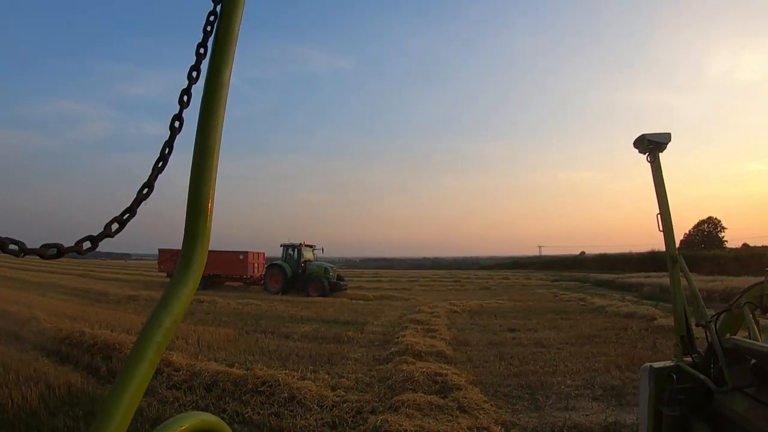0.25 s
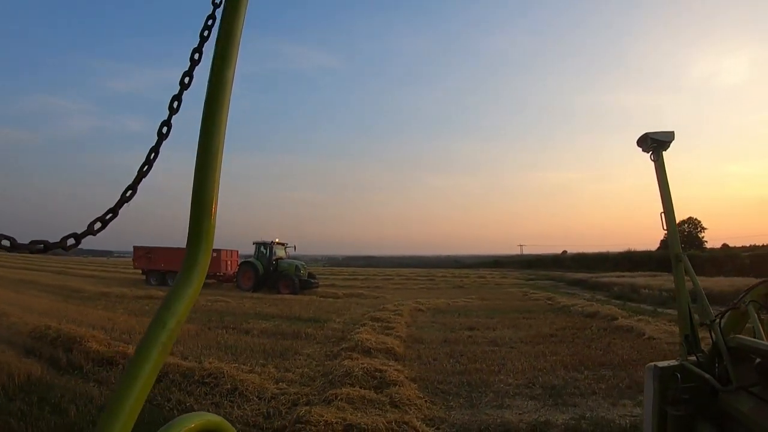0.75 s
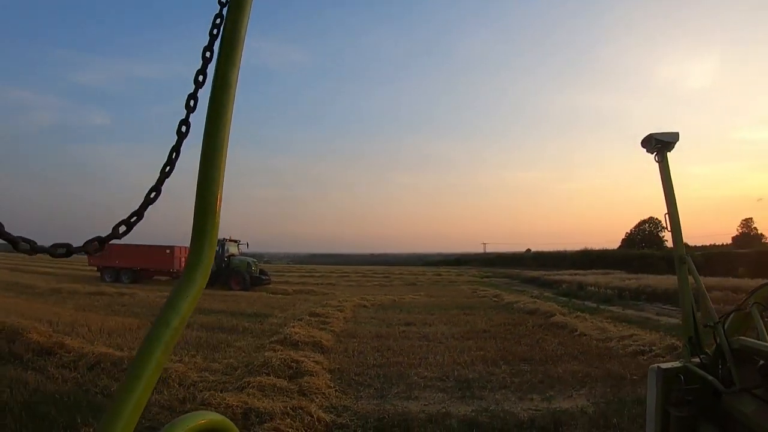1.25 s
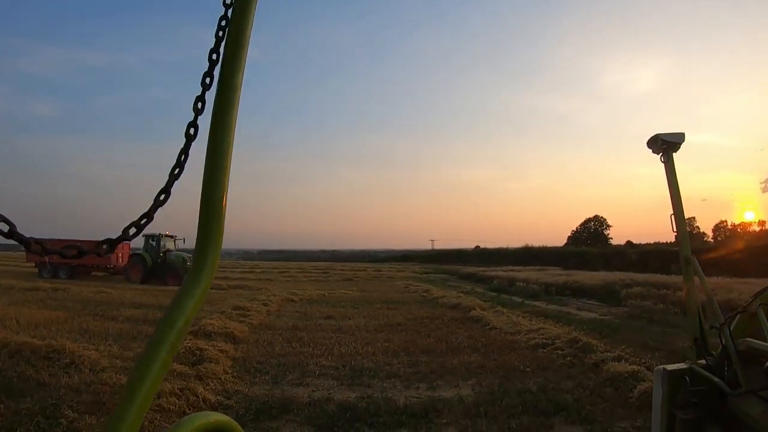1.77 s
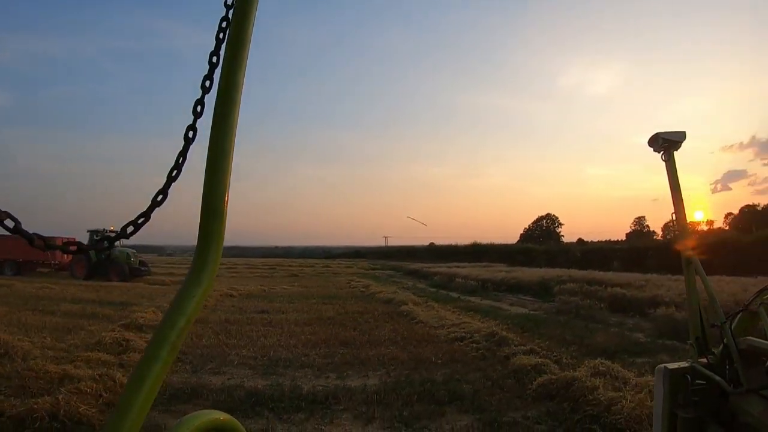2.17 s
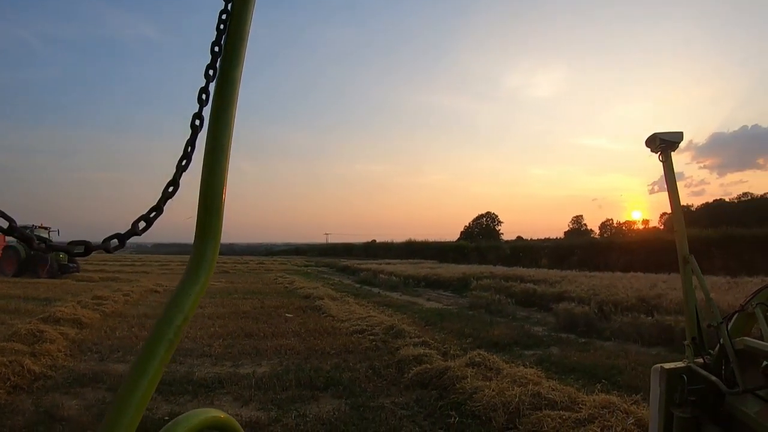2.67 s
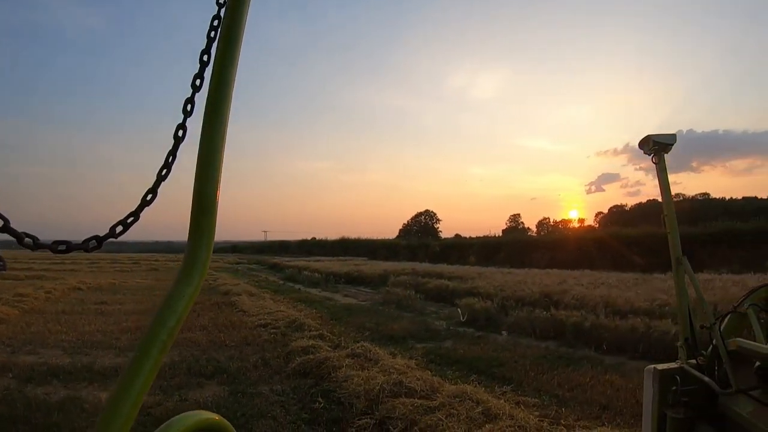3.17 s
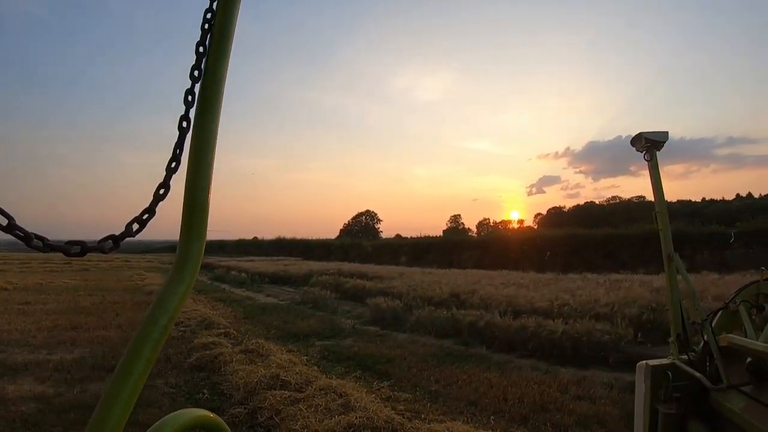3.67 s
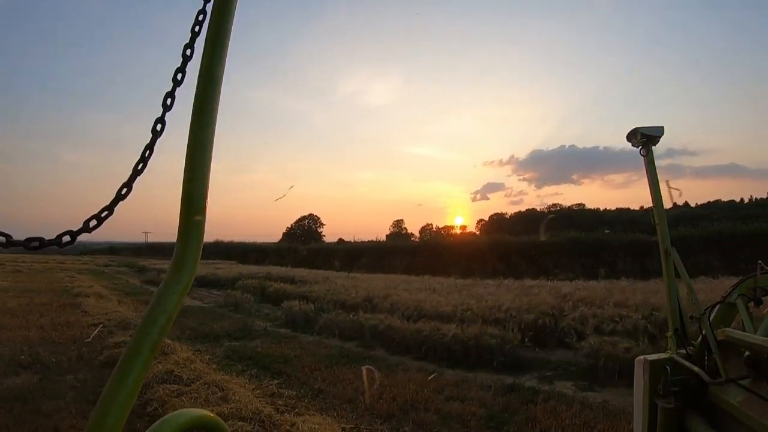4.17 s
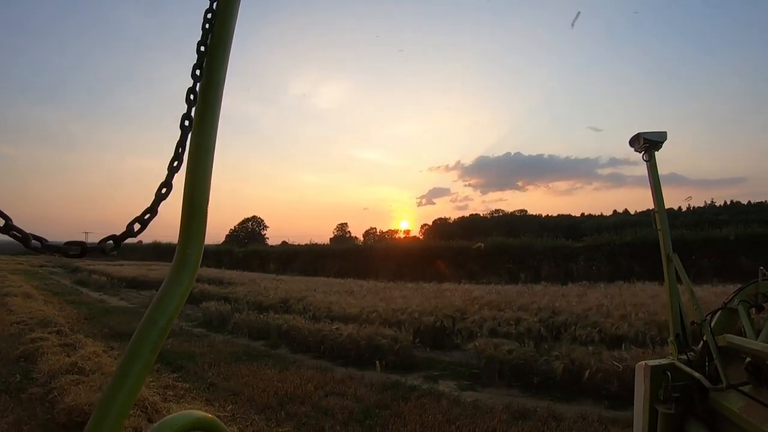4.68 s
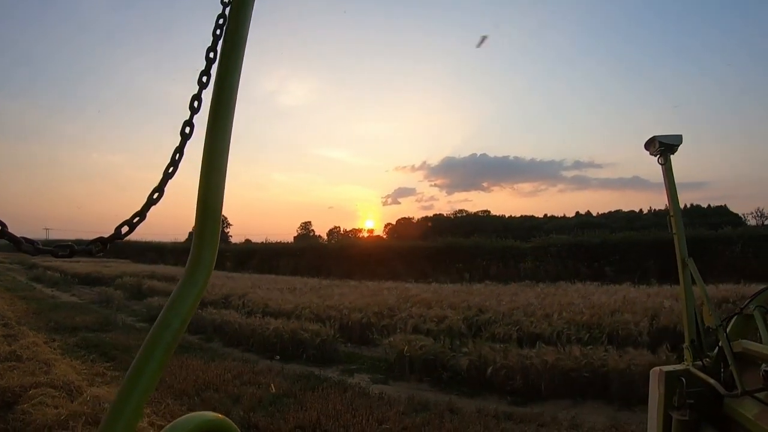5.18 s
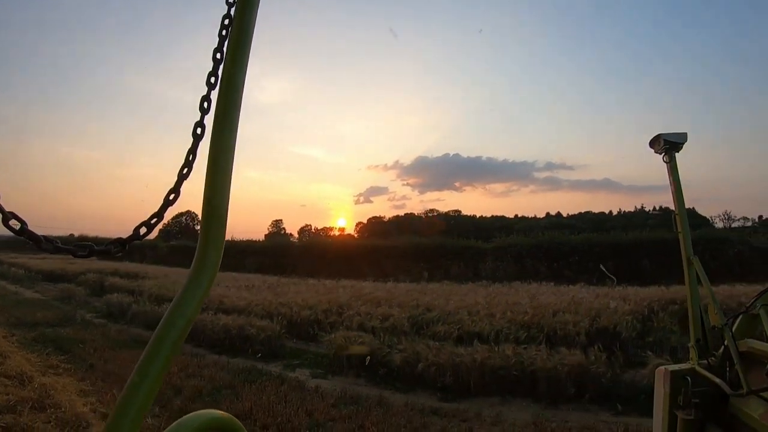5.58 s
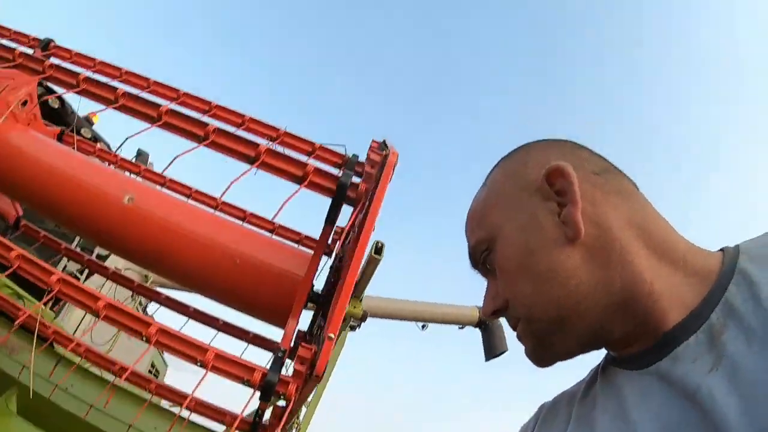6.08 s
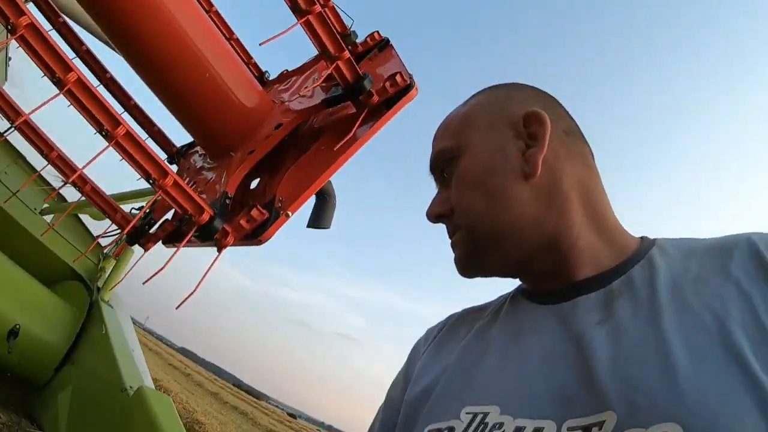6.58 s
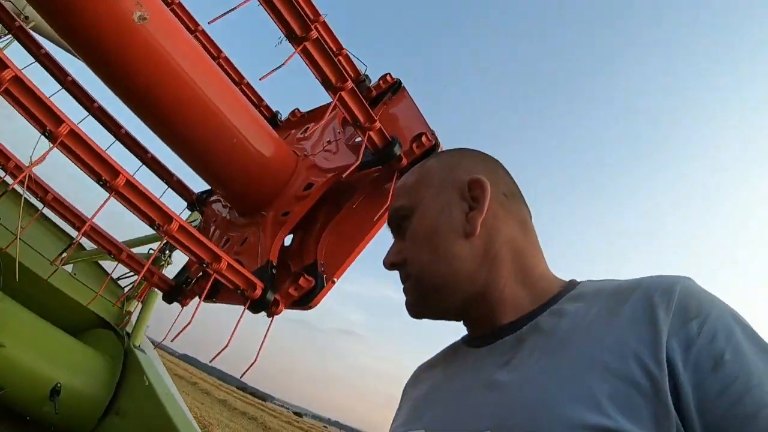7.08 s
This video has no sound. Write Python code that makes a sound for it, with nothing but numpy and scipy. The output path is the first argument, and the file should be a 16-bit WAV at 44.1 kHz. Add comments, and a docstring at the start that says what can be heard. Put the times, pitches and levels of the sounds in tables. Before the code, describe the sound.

From 0 to about 5.7 s, a combine harvester works at full load, heard close from on board: a loud, thick roar coloured by resonating sheet metal, deep rumble beneath, and a low-to-middle drone of shafts and drum whose tones waver and beat, sagging slightly in pitch around 1 s. Grainy chaff hiss rides on top in small swells, busier near 4.7 to 5.5 s. At 5.7 s it cuts off dead, leaving about a quarter second of silence. By 5.95 s a much quieter outdoor scene has quickly faded in beside the idling machine. Straw crunches and snaps crisply, densest from 6.0 to 6.3 s, then sparser. A clean low hum grows to its strongest from 6.6 to 7.0 s, then drops back, with faint whines and cooling air. Wind puffs thump the hand-held microphone around 6.2 to 6.3 s and 6.9 to 7.2 s, until the end at 7.3 s.

```python
"""A combine harvester at work, heard from on board: noise shaped by panel resonances makes the threshing roar,
smeared tones make the drone of drum and shafts, and grainy noise hisses in swells of chaff.
It cuts off abruptly to a short silence; then a second scene fades in beside the idling machine: a low steady
hum with fainter whines, noise gusts and puffs of wind on the microphone, and straw underfoot that rustles
in strokes of grainy noise and snaps in short ringing bursts."""
import sys
import numpy as np
from scipy import signal
from scipy.fft import rfft, irfft, next_fast_len
from scipy.io import wavfile
from scipy.ndimage import uniform_filter1d, map_coordinates

SR = 44100
rng = np.random.default_rng(int(sys.argv[2]) if len(sys.argv) > 2 else 0)


def digitize_waveform(pressure):
    """Quantize a signal to 16-bit integers and store it at the path in sys.argv[1].

    Rows of a 2-D input are taken as channels; values are limited to [-1, 1].
    """
    field = np.atleast_2d(pressure).T
    bounded = np.clip(field, -1, 1)
    quanta = np.round(bounded * 32767).astype(np.int16)
    wavfile.write(sys.argv[1], SR, quanta)


N = 323694  # length in samples


def amp(db):
    """Gain of a level in dB."""
    return 10 ** (np.asarray(db) / 20)


def unit(x):
    """Scaled to rms 1."""
    return x / np.sqrt(np.mean(x ** 2) + 1e-20)


def curves(rows):
    """One value per sample for each column after the time."""
    time_s, *columns = np.transpose(rows)
    return [np.interp(np.arange(N) / SR, time_s, column) for column in columns]


def wobble(rate):
    """A smooth random curve, rate knots a second."""
    knots = rng.standard_normal(int(N * rate / SR) + 4)
    return map_coordinates(knots, [np.arange(N) * rate / SR])


def filtered(x, response):
    """x times a response of frequency."""
    m = next_fast_len(len(x) + 8192)
    return irfft(rfft(x, m) * response(np.fft.rfftfreq(m, 1 / SR)), m)[:len(x)]


def coloured(x, spectrum):
    """x through (Hz, dB) points on a log axis, rms 1."""
    f, db = np.transpose(spectrum)
    return unit(filtered(x, lambda hz: amp(np.interp(np.log(hz + 1), np.log(f + 1), db))))


def rush(patchy_db):
    """White noise with patches of random gain in time and frequency."""
    z = signal.stft(rng.standard_normal(N + 512), nperseg=512)[2]
    field = uniform_filter1d(rng.standard_normal(z.shape), 6, 0)
    field = uniform_filter1d(field, 10, 1)
    return signal.istft(z * amp(patchy_db * unit(field)), nperseg=512)[1][:N]


def grainy(spiky_db, rate):
    """White noise in tiny bursts of uneven size, as of many small impacts."""
    return unit(amp(spiky_db * wobble(rate)) * rng.standard_normal(N))


def tone(hz):
    """A sine of rms 1 that follows a pitch curve."""
    return np.sqrt(2) * np.sin(2 * np.pi * (np.cumsum(hz) / SR + rng.random()))


# Gusts, before the fade-in gain: time_s, buffet_db, flutter_db
GUSTS = [(5.95, -40.5, -62), (6.12, -40, -56), (6.18, -32, -51), (6.28, -31, -39.5), (6.4, -34.5, -46),
         (6.5, -36, -45), (6.57, -38, -43), (6.63, -39, -41), (6.73, -33, -32.5), (6.82, -30.5, -37),
         (6.87, -31, -39), (6.94, -28, -32.5), (6.99, -32, -28.5), (7.03, -32, -33), (7.08, -38, -40),
         (7.15, -32.5, -42), (7.22, -29.5, -40), (7.27, -34, -44), (7.34, -35, -53)]
# Colour of the low buffets: freq_hz, density_db (relative, per Hz)
BUFFET_COLOUR = [(9, -39), (15, 1), (43, 1.5), (92, -5), (130, -2), (210, -9), (300, -25), (550, -120)]
# Colour of the higher flutter: freq_hz, density_db (relative, per Hz)
FLUTTER_COLOUR = [(140, -37), (210, 1.5), (330, 0), (430, -7.5), (560, -21.5), (900, -55), (1300, -120)]
# Single puffs, strength before the onset and fade-in gain: start_s, strength_db, pitch_hz, t60_s
PUFFS = [(6.17, -19, 55, .07), (6.262, -11, 60, 0.096), (6.264, -18, 228, 0.045), (6.30, -16, 95, 0.085),
         (6.335, -16, 75, .07), (6.93, -16, 110, .06), (6.975, -17, 330, .05), (7.01, -17, 60, .07),
         (7.179, -19, 100, .06), (7.222, -20, 55, .06)]


def wind():
    """Air buffets the hand-held microphone in lumps, and single puffs jolt it as decaying sines."""
    buffet_db, flutter_db = curves(GUSTS)
    lumps = amp(1.2 * wobble(40) + .6 * wobble(16))
    buffet = unit(lumps * coloured(rng.standard_normal(N), BUFFET_COLOUR))
    flutter = unit(lumps * amp(1.3 * wobble(22)) * coloured(rng.standard_normal(N), FLUTTER_COLOUR))
    out = amp(buffet_db) * buffet + amp(flutter_db) * flutter
    t = np.arange(SR // 8) / SR
    onset = 1 - np.exp(-t / 0.0036)
    for start_s, strength_db, pitch_hz, t60_s in PUFFS:
        start = round(start_s * SR)
        puff = amp(strength_db - 60 * t / t60_s) * onset * np.sin(2 * np.pi * pitch_hz * t)
        out[start:][:len(t)] += puff[:N - start]
    return out


# Feet and hands in the stubble, before the fade-in gain:
# peak_s, length_s, crunch_db, bright_db (swish relative to crunch)
STUBBLE_STROKES = [(6.03, 0.033, -42, -19), (6.095, 0.04, -39.5, -11.5), (6.128, 0.05, -36.5, -5),
                   (6.172, 0.04, -54, -2), (6.208, 0.038, -56.5, -1.5), (6.241, 0.0091, -44, -4),
                   (6.301, 0.026, -47, -3), (6.32, 0.043, -41.5, 0), (6.447, 0.045, -56, 0),
                   (6.514, 0.04, -48.5, -9), (6.577, 0.059, -55, 1.5), (6.628, 0.056, -46, -4),
                   (6.688, 0.04, -48, -8.5), (6.73, 0.041, -50.5, -1), (6.812, 0.054, -62, 2),
                   (7.047, 0.054, -61, -10), (7.113, 0.06, -56, -9.5), (7.19, 0.13, -49.5, -15.5),
                   (7.254, 0.05, -57.5, -6), (7.312, 0.07, -54, -3)]
# Colour of the crushing: freq_hz, density_db (relative, per Hz)
CRUNCH_COLOUR = [(410, -56), (750, 5), (1100, -16), (1400, -2.5), (2200, 2), (3300, 0), (4800, -7.5),
                 (5600, -25), (7000, -50), (13000, -120)]
# Colour of the brushing: freq_hz, density_db (relative, per Hz)
SWISH_COLOUR = [(3000, -28), (4500, -3), (5100, -3), (5700, -12), (6500, -4), (7000, -5.5), (7800, -8),
                (9200, -14), (10800, -20), (11500, -34), (14000, -42), (15300, -66)]
# Snapping stalks, level before the onset and fade-in gain: start_s, level_db, centre_hz, width_hz
STALK_SNAPS = [(6.015, -43, 7600, 2000), (6.028, -40, 3000, 3000), (6.087, -30, 1800, 1200),
               (6.105, -27, 2000, 2000), (6.138, -30, 2700, 1000), (6.142, -24, 3200, 2000),
               (6.1423, -35, 8000, 4000), (6.154, -28, 2500, 2000), (6.171, -39, 2100, 900),
               (6.175, -45, 8500, 3500), (6.198, -50, 9500, 2500), (6.238, -36.5, 5000, 7000),
               (6.242, -26.5, 3500, 6000), (6.243, -32, 2100, 900), (6.305, -50, 10940, 3500),
               (6.397, -54, 7700, 1200), (6.428, -48, 7500, 3000), (6.573, -49, 8500, 5000),
               (6.6, -37, 2500, 500), (6.629, -33, 4300, 700), (6.715, -45, 8500, 4000),
               (6.73, -44, 4400, 1500), (6.748, -50, 7200, 2000), (6.857, -49, 8000, 4000),
               (7.042, -50, 7500, 5000), (7.113, -47, 3450, 400), (7.195, -37, 2470, 400),
               (7.218, -50, 8000, 5000), (7.253, -45, 2670, 400)]
RISE_DB, FALL_DB = 18.5, 24.5  # level lost one stroke length before and after the peak
STIR_DB, STIR_SWISH_DB = -56, -73.5  # the stubble never quite rests
SNAP_T60_S, SNAP_RING = 0.0092, 12.5  # shortest decay; a narrower snap rings SNAP_RING / width_hz s longer


def straw():
    """Stubble crushed and brushed in strokes that swell and break off, with single stalks that snap."""
    now = np.arange(N) / SR
    crunch, swish = amp(STIR_DB), amp(STIR_SWISH_DB)
    for peak_s, length_s, crunch_db, bright_db in STUBBLE_STROKES:
        u = (now - peak_s) / length_s
        loss_db = np.where(u < 0, RISE_DB * np.abs(u), FALL_DB * np.abs(u) ** 1.57)
        stroke = amp(crunch_db - loss_db)
        crunch = crunch + stroke
        swish = swish + amp(bright_db) * stroke
    crunch_noise = grainy(spiky_db=1.8, rate=320) + 0.7 * rush(patchy_db=2.5)
    swish_noise = grainy(spiky_db=2, rate=350) + .7 * rush(patchy_db=3)
    out = crunch * coloured(crunch_noise, CRUNCH_COLOUR) + swish * coloured(swish_noise, SWISH_COLOUR)
    t = np.arange(SR // 20) / SR
    onset = 1 - np.exp(-t / 0.00073)
    for start_s, level_db, centre_hz, width_hz in STALK_SNAPS:
        band = lambda f: 1 / (1 + (2 * (f - centre_hz) / width_hz) ** 4)
        burst = unit(filtered(rng.standard_normal(len(t)), band))
        t60_s = SNAP_T60_S + SNAP_RING / width_hz
        out[round(start_s * SR):][:len(t)] += amp(level_db - 60 * t / t60_s) * onset * burst
    return out


# Idling levels before the fade-in gain: time_s, machine_db (reference for noise and whines), air_db
IDLE_LEVELS = [(5.95, -52, -50), (6.12, -52, -56), (6.35, -56, -59), (6.65, -48.5, -57), (6.9, -50.5, -53),
               (7.15, -50.5, -56), (7.34, -49.5, -60)]
# The hum as the listener moves, before the fade-in gain: time_s, level_db
HUM_LEVEL = [(5.95, -47), (6.1, -42.5), (6.48, -36.5), (6.62, -30), (6.975, -29.5), (7.02, -37.5),
             (7.15, -40), (7.34, -44)]
HUM_HZ = 259
# Lower engine orders, before the fade-in gain: pitch_hz, level_db
ENGINE_ORDERS = [(86.2, -43), (108, -45), (218, -50)]
# Higher, fainter engine orders: pitch_hz, spread_hz (unsteadiness), level_db (relative to machine_db)
HIGHER_ENGINE_ORDERS = [(330, 5, -7), (422, 4, -4), (515, 4, -8), (848, 5, -4.5), (1211, 8, -10), (1310, 8, -10)]
# Colour of the machine noise: freq_hz, density_db (relative, per Hz)
MACHINE_COLOUR = [(150, -33), (250, -4), (430, -7), (540, -3.5), (840, -5.5), (900, -4.5), (1020, -10),
                  (1100, -7.5), (1310, -9), (1380, -16), (1700, -13.5), (2200, -20.5), (3500, -74)]
# Colour of the cooling air: freq_hz, density_db (relative, per Hz)
AIR_COLOUR = [(900, -35), (1600, 2), (2800, 3.5), (3200, 5), (3600, 1), (4000, -1), (4500, -9), (5000, -6),
              (5600, -22), (6500, -14), (8500, -25), (10000, -21), (11000, -31), (13000, -60),
              (15000, -120)]


def idling():
    """The idling machine: one clean hum, low engine orders and faint whines over machine noise and cooling air."""
    machine_db, air_db = curves(IDLE_LEVELS)
    orders = sum(amp(level_db + 2.5 * wobble(6)) * tone(pitch_hz + 1.5 * wobble(10))
                 for pitch_hz, level_db in ENGINE_ORDERS)
    whines = sum(amp(level_db + 3.1 * wobble(15)) * tone(pitch_hz + spread_hz * wobble(18))
                 for pitch_hz, spread_hz, level_db in HIGHER_ENGINE_ORDERS)
    noise = amp(7.0) * coloured(rush(patchy_db=2.0), MACHINE_COLOUR)
    machine = amp(machine_db) * (noise + whines)
    air = amp(air_db) * coloured(rush(patchy_db=6.0), AIR_COLOUR)
    hum = amp(curves(HUM_LEVEL)[0] + 0.4 * wobble(12)) * tone(HUM_HZ + 0.6 * wobble(8))
    return hum + orders + machine + air


# Levels of the rotating parts: time_s, shaft_db, auger_db, drum_db, fan_db
DRONE_LEVELS = [(0, -21, -28, -31, -33), (0.3, -23, -25, -23, -34), (0.9, -22, -24, -20.5, -31),
                (1.3, -21, -25, -23.5, -33), (1.8, -24, -24, -19, -33), (2.1, -23, -26, -24.5, -32),
                (2.45, -22, -26, -32, -29), (2.9, -27, -26, -21.5, -25), (3.25, -26, -27, -26, -24),
                (3.55, -25, -23, -23, -22.5), (3.85, -30, -34, -21, -25), (4.2, -28, -35, -19.5, -33),
                (4.55, -29, -36, -22.5, -30), (4.9, -30, -35, -28, -23.5), (5.3, -24, -24, -25, -23),
                (5.66, -26, -24, -29, -22.5)]
# Shaft, auger, drum, fan in turn: pitch_hz, smear_hz (sets pitch wander and beating), steady (amplitude 0-1)
DRONE_TONES = [(165, 6, .88), (255, 22, .1), (383, 7, .92), (472, 9, .87)]
# Shaft speed sags under load: time_s, speed_ratio
SHAFT_SPEED = [(0, 1.008), (0.5, 1.004), (0.9, .985), (1.4, .988), (1.9, 1.006), (2.9, 1.008), (3.6, 1.002),
               (4.2, 1.0), (5.66, 1.0)]


def drone():
    """Rotating parts under uneven load: each tone is part steady, part a smear that beats in and out of the roar."""
    out = 0
    speed = curves(SHAFT_SPEED)[0]
    for level_db, (pitch_hz, smear_hz, steady) in zip(curves(DRONE_LEVELS), DRONE_TONES):
        turn = 2 * np.pi * np.cumsum(pitch_hz * speed + .4 * smear_hz * wobble(14)) / SR
        smear = (1 - steady ** 2) ** .5
        along = steady + smear * wobble(2 * smear_hz)
        across = smear * wobble(2 * smear_hz)
        smeared_tone = unit(along * np.sin(turn) + across * np.cos(turn))
        out = out + amp(level_db + .6 * wobble(4)) * smeared_tone
    return out


# Levels of the working machine: time_s, rumble_db, roar_db, hiss_db (chaff, before its swells)
WORK_LEVELS = [(0, -19, -15, -31), (1.5, -20, -15.5, -32.5), (2.5, -20, -15, -30), (4, -18.5, -15.5, -31),
               (4.7, -19, -15.5, -29.5), (5.66, -21, -15, -31.5)]
# Sheet-metal resonances: pitch_hz, width_hz, boost_db
PANEL_RESONANCES = [(129, 3.9, -3.5), (140.4, 4.4, 7), (347, 25, 7), (506.6, 11, 2), (617, 54, 4),
                    (784, 52, 5), (1220, 140, 8)]
# Colour of the rumble: freq_hz, density_db (relative, per Hz)
RUMBLE_COLOUR = [(8.8, -45.5), (15, -10), (38, -6), (119, -4.5), (156, -6.5), (200, -8), (260, -39),
                 (440, -120)]
# Colour of the roar before the panels: freq_hz, density_db (relative, per Hz)
ROAR_COLOUR = [(65, -26.5), (110, -4.5), (160, -4), (215, -3.5), (300, -4.5), (410, -3), (480, -2.5),
               (540, -7.5), (780, -12.5), (1080, -30.5), (2000, -31.5), (2600, -52.5), (4400, -120)]
# Colour of the chaff hiss: freq_hz, density_db (relative, per Hz)
HISS_COLOUR = [(530, -29), (900, -1.5), (1430, -10), (2750, -15), (3200, -21.5), (3700, -20), (5850, -36),
               (7300, -34), (8700, -39.5), (9650, -47.5), (10800, -42.5), (11600, -51.5), (13300, -52.5),
               (15600, -71)]
# Thicker wads and gaps in the crop: peak_s, swell_db (rise or dip of the hiss)
CROP_CLUMPS = [(0.0, 3), (0.06, -2), (0.12, 1), (1.09, -2.5), (1.43, -1.5), (1.89, 1.5), (2.3, 1.5),
               (2.49, -1), (2.56, 2.5), (2.85, 1), (2.95, -2), (3.48, 1), (3.79, 1.5), (4.18, -3),
               (4.24, 1), (4.69, 3), (4.76, -2), (4.8, 2.5), (4.95, 1.5), (5.11, 2), (5.22, 3.5),
               (5.31, 2.5), (5.5, 2.5)]
CLUMP_S = 0.031  # half length of a swell


def threshing():
    """Crop beaten through the drum shakes the panels; grain and chaff rattle over the sieves."""
    rumble_db, roar_db, hiss_db = curves(WORK_LEVELS)
    panels = lambda f: amp(sum(boost_db / (1 + (2 * (f - pitch_hz) / width_hz) ** 2)
                               for pitch_hz, width_hz, boost_db in PANEL_RESONANCES))
    roar = unit(filtered(coloured(rush(patchy_db=.4), ROAR_COLOUR), panels))
    hiss = coloured(grainy(spiky_db=1.5, rate=270) + 0.7 * rush(patchy_db=1.2), HISS_COLOUR)
    rumble = coloured(rng.standard_normal(N), RUMBLE_COLOUR)
    t = np.arange(N) / SR
    swell_db = sum(db * np.exp(-((t - peak_s) / CLUMP_S) ** 2) for peak_s, db in CROP_CLUMPS)
    swell_db = swell_db + 0.4 * wobble(9) + 0.7 * wobble(25)
    return amp(rumble_db) * rumble + amp(roar_db) * roar + amp(hiss_db + swell_db) * hiss


CUT_S = 5.6722  # the working scene ends abruptly
FLOOR_DB, FLOOR_T60_S = -36, .05  # lower bound of the gain at the cut, and its fall
# The idling scene fades in: time_s, gain_db
FADE_IN = [(5.885, -64), (5.905, -21), (5.93, -9), (5.96, 1), (7.34, 2)]


def scene():
    """The working machine, a short silent gap, then the idling machine with wind and straw."""
    t = np.arange(N) / SR
    working = np.clip(t / .002, 0, 1) * np.clip((CUT_S - t) / .00012, 0, 1)  # soft opening, sudden end
    floor = (t > CUT_S - .001) * amp(FLOOR_DB - 60 * np.abs(t - CUT_S) / FLOOR_T60_S)
    working = np.maximum(working, floor)
    beside = amp(curves(FADE_IN)[0]) * (t > FADE_IN[0][0])
    return ((threshing() + drone()) * working + (idling() + wind() + straw()) * beside)[None]


TOP_HZ = 15700  # band limit


def record(dry):
    """The loudest peaks are rounded off towards 0.82; nothing is kept above the band limit."""
    soft = dry[0] / (1 + np.abs(dry[0] / .82) ** 5) ** (1 / 5)
    return filtered(soft, lambda hz: hz < TOP_HZ)[None]


dry = scene()
out = record(dry)
digitize_waveform(out)
```